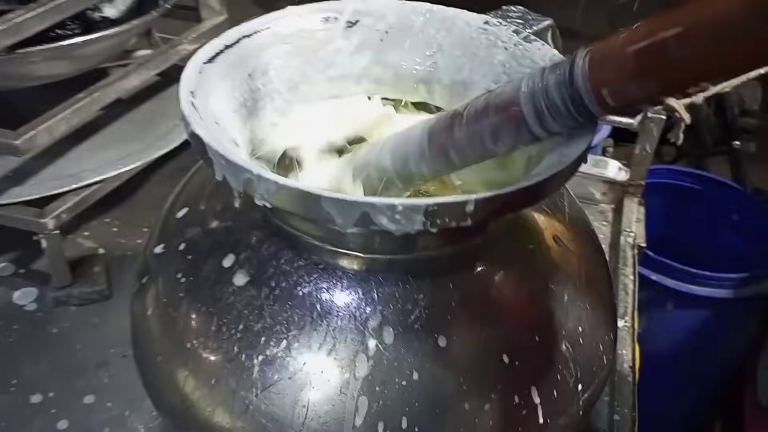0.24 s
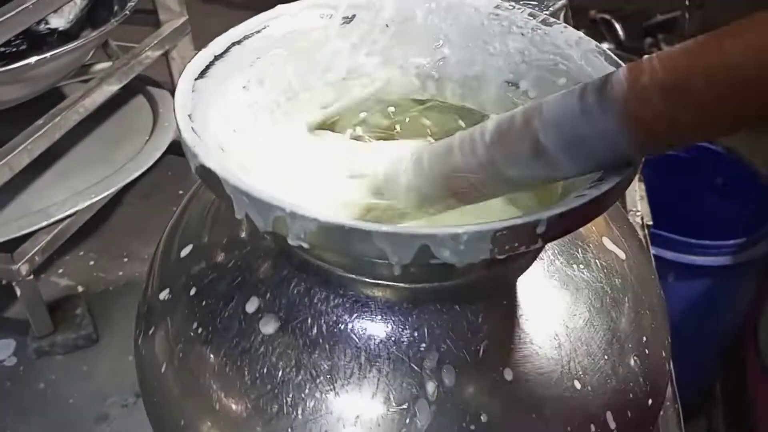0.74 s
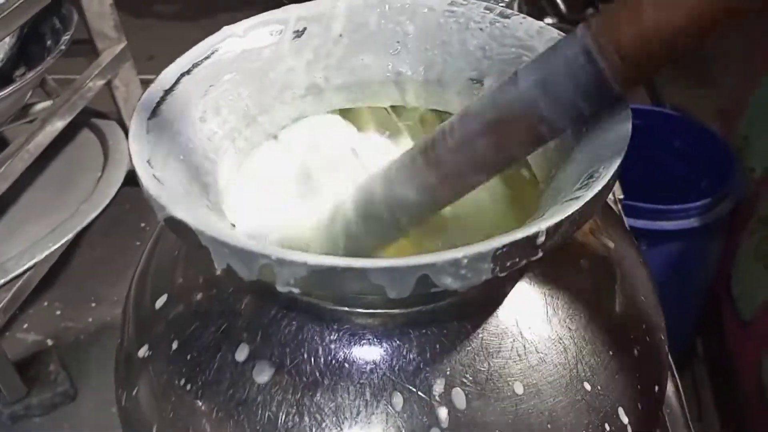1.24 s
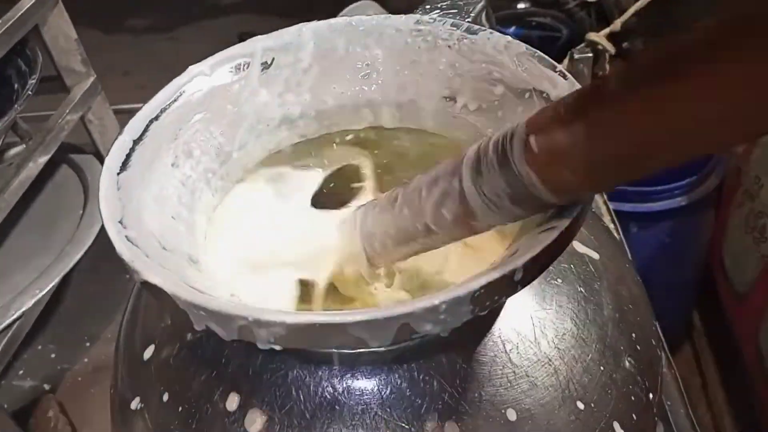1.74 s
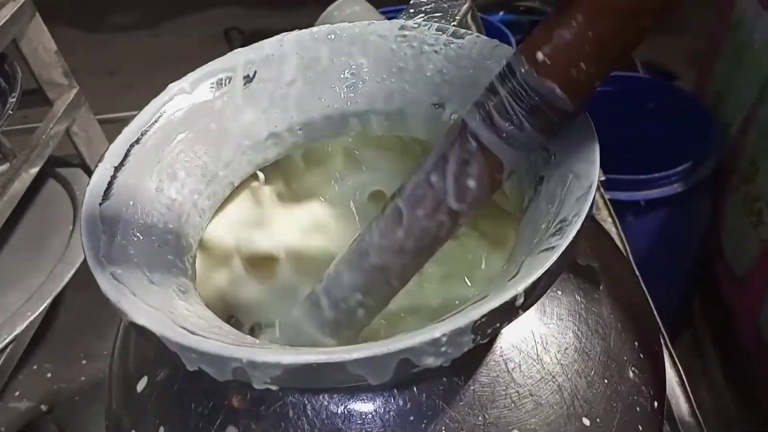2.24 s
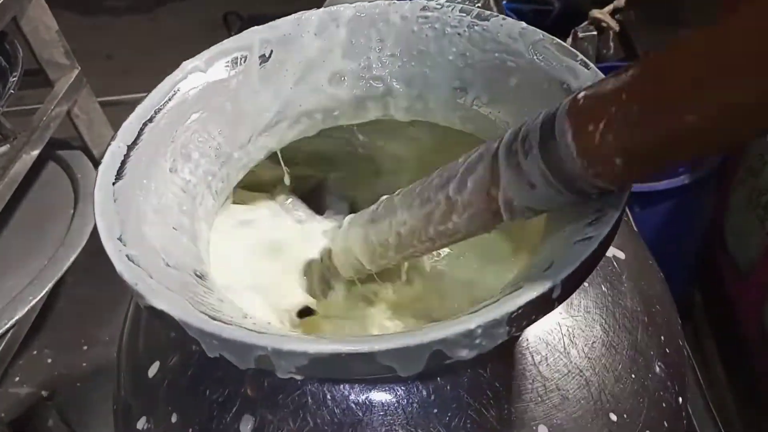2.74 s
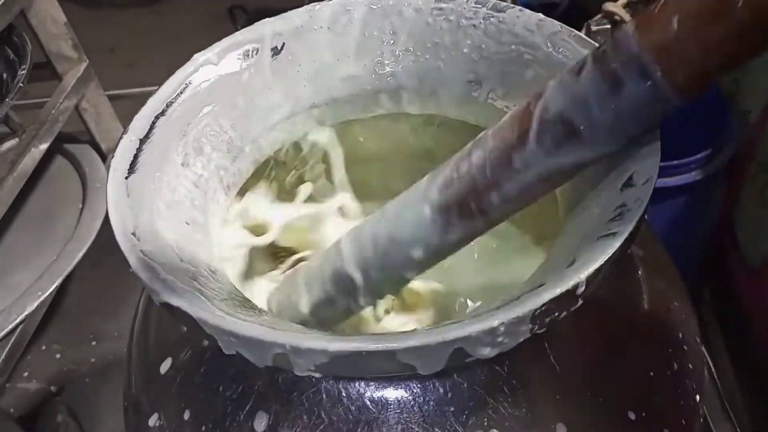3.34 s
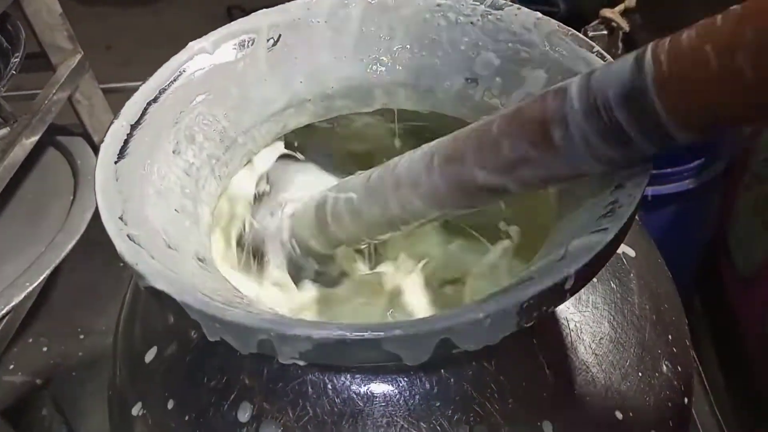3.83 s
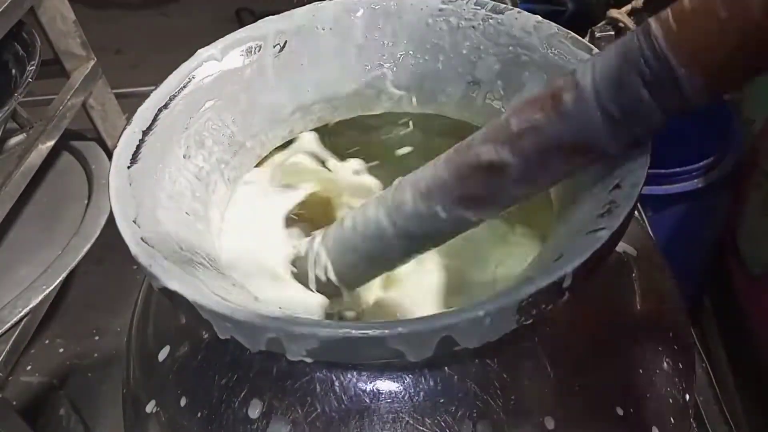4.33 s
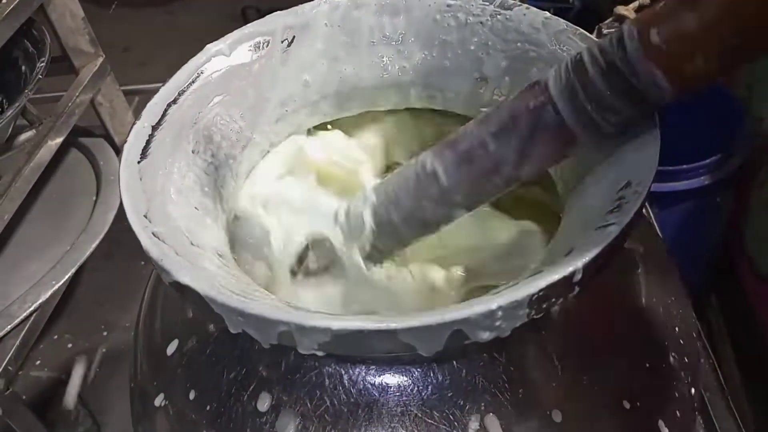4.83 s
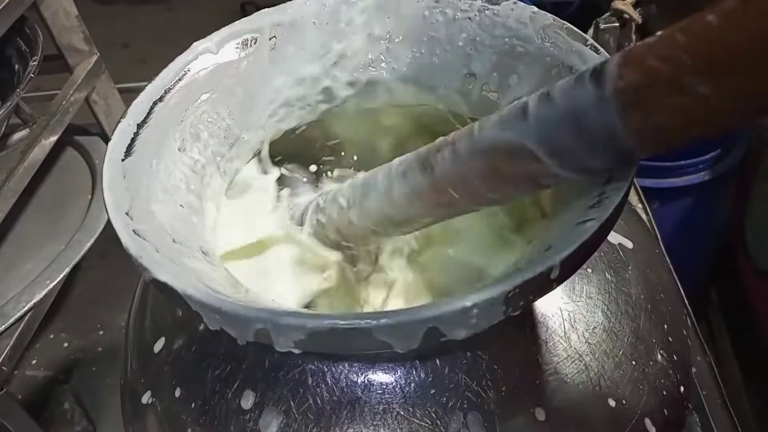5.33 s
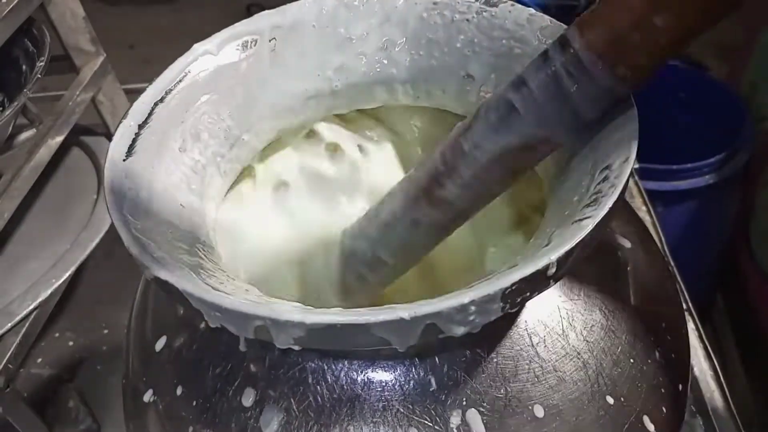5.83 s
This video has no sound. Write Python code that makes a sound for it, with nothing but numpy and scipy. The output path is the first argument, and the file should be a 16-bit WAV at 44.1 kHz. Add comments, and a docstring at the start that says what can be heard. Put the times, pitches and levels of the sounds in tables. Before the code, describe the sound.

Close up, a wooden stick churns watery curd inside a round metal pot. A little over twice a second, clustered air pockets gulp at one low pitch with wet slaps, wrapped in gurgles, splashes and froth fizz. Between strokes come small plops and slurps as the stick draws back. A faint street stall wash and low rumble lie behind.

```python
"""Big air pockets gulp at one low pitch as a wooden stick churns curd in a round metal pot, a little over
two strokes a second. Each gulp is a damped tone with a slap of noise that rings the pot. Bubbles gurgle, curd
splashes and froth fizzes: swarms of short rings, shaped by each stroke. The stick draws back with a plop,
a noise slurp and a low throb. Behind it lie a street stall's filtered noise, low rumble and thin whine."""
import sys
import numpy as np
from scipy import signal
from scipy.fft import rfft, irfft
from scipy.io import wavfile

SR = 44100
rng = np.random.default_rng(int(sys.argv[2]) if len(sys.argv) > 2 else 0)


def to_wav(sig):
    """Store sig (one row per channel, or 1-D mono) as 16-bit WAV at the path in sys.argv[1].

    Samples outside -1..1 are clipped; the rate is SR.
    """
    pcm = np.clip(np.atleast_2d(sig), -1, 1) * 32767
    pcm = np.round(pcm).astype(np.int16)
    wavfile.write(sys.argv[1], SR, pcm.T)  # frames by channels


N = 267907  # length in samples
TIME = np.arange(N) / SR

# Big air pockets: start_s, level_db (peak, before the throb trim), pitch_hz (at the peak), swell_s (time to peak)
AIR_POCKETS = [(0.169, -15, 220, 0.01), (0.21, -14, 235, 0.0097), (0.256, -14.5, 229, 0.018),
               (0.298, -15.5, 230, 0.0076), (0.603, -15.5, 193, 0.018), (0.647, -12.5, 227, 0.013),
               (0.722, -9, 220, 0.011), (1.055, -13, 217, 0.015), (1.076, -17.4, 243, 0.025),
               (1.132, -13.5, 244.0, 0.013), (1.159, -11, 224.5, 0.027), (1.203, -17.5, 231.5, 0.034),
               (1.568, -11.5, 230, 0.0074), (1.589, -11, 222, 0.01), (1.638, -9.5, 224, 0.0115),
               (1.988, -11.5, 218.0, 0.01), (2.036, -8.5, 243, 0.0077), (2.068, -9.5, 219, 0.016),
               (2.105, -13.5, 224, 0.011), (2.125, -25, 238, 0.033), (2.468, -10.5, 219, 0.011),
               (2.489, -13, 233, 0.012), (2.552, -7.5, 225, 0.0088), (2.591, -11.5, 220, 0.013),
               (2.885, -11.5, 212, 0.0095), (2.915, -10, 221, 0.009), (2.961, -16, 233.6, 0.017),
               (2.992, -10, 219.0, 0.01), (3.029, -14.5, 213, 0.017), (3.369, -10, 224, 0.0056),
               (3.39, -7.5, 228.0, 0.0123), (3.435, -15, 224, 0.0091), (3.466, -7.5, 229, 0.0136),
               (3.513, -12, 225, 0.013), (3.818, -8.5, 220, 0.0096), (3.86, -10, 213, 0.012),
               (3.897, -9, 222, 0.014), (3.938, -11, 216, 0.014), (3.977, -15, 202, 0.015),
               (4.274, -17.5, 204, 0.022), (4.297, -10.5, 224.0, 0.017), (4.33, -14.5, 258, 0.019),
               (4.387, -10.5, 220, 0.016), (4.701, -14, 229, 0.0157), (4.736, -9, 221.0, 0.009),
               (4.783, -9, 222, 0.015), (4.818, -9.5, 224, 0.012), (4.855, -10, 218, 0.013),
               (5.205, -10.5, 244, 0.0059), (5.221, -16.5, 201, 0.024), (5.281, -14.4, 247, 0.0056),
               (5.306, -9.5, 227.5, 0.012), (5.368, -17.6, 243, 0.0137), (5.652, -9, 213.0, 0.0092),
               (5.707, -10, 232, 0.0082), (5.737, -8.5, 224, 0.014), (5.768, -17, 233, 0.0153),
               (5.831, -22.0, 216, 0.018)]
# Colour of the slap: pitch_hz, level_db (per Hz, relative)
SLAP_COLOUR = [(60, -25.5), (130, -10.5), (210, 2.5), (380, 10), (560, 5), (850, -9), (1100, -14),
               (1800, -26), (3000, -41.5), (8000, -60)]
# Ringing air in the pot, belly then neck: pitch_hz, decay_s (to -60 dB), level_db (relative)
POT_MODES = [(233, 0.16, 9), (325, 0.1, -7.5), (375.7, 0.51, -7.5), (465, 0.25, -19), (520, 0.14, -23),
             (690, 0.04, -31.5), (752, 0.2, 7.5), (916, 0.27, 2.5)]


def gulps(throb_db=-.5, fall=1.98, sag=0.1, slap_db=4.0, slap_t60=0.072):
    """Each pocket closes with a slap, then throbs for a few cycles as its pitch settles."""
    throbs, slap_power = np.zeros(N), np.zeros(N)
    t = np.arange(SR // 5) / SR
    slap_shape = (1 - np.exp(-t / .002)) * decay(t, slap_t60)
    for s, db, hz, swell in AIR_POCKETS:
        start, _, _, force_db, *_ = min(STROKES, key=lambda stroke: abs(stroke[0] - s))
        # slaps grow as the stick drives deeper, then settle at one level, softer after forceful strokes
        depth_db = np.interp(s - start, [0, 0.097, 0.31], [-43, -15 + force_db, -21])
        add(throbs, s, amp(db + throb_db) * throb(hz, swell, fall, sag))
        add(slap_power, s, (amp(db + depth_db) * slap_shape) ** 2)
    wet_noise = steadied(coloured(rng.standard_normal(N), SLAP_COLOUR), .015)
    slaps = amp(slap_db) * np.sqrt(slap_power) * wet_noise
    return throbs + slaps + pot(slaps, POT_MODES)


def throb(hz, swell, fall, sag):
    """A pocket of air swells and dies within a few cycles while its pitch settles downward."""
    u = np.arange(SR // 5) / SR / swell  # time counted in swells; loudest at 1
    turns = np.cumsum(hz * (1 + sag * (2 ** (1 - u) - 1))) / SR
    envelope = u ** 2 * np.exp(2 * (1 - u ** fall) / fall)
    return envelope * np.sin(2 * np.pi * turns)


# The stick draws back and opens a hollow: start_s, plop_db, throb_db
BACKSTROKES = [(0.553, -32, -49), (1.387, -46, -33), (1.954, -25.5, -47), (2.324, -23.5, -39),
               (3.253, -32.5, -26), (4.172, -27.5, -25), (5.079, -31, -22.5), (5.977, -43, -35.5)]
# Colour of the slurp: pitch_hz, level_db (per Hz, relative)
SLURP_COLOUR = [(250, -23.5), (480, 1), (680, -7.5), (890, 1), (1080, -4), (1300, -18.5), (1800, -19),
                (3000, -43.5)]


def backstrokes(plop_hz=890, soft=8, slurp_db=-9, slurp_t60=.22, throb_hz=228, swell=0.017):
    """The hollow behind the stick opens with a plop, a short slurp and a soft low throb."""
    plop, slurp, low = np.zeros((3, N))
    t = np.arange(SR // 5) / SR
    ring = bubble(plop_hz, t60=.09, rise=.03, soft=soft)
    slurp_shape = (1 - np.exp(-t * plop_hz / soft)) * decay(t, slurp_t60)
    for s, plop_db, throb_db in BACKSTROKES:
        add(plop, s, amp(plop_db) * ring / abs(ring).max())
        add(slurp, s, amp(plop_db + slurp_db) * slurp_shape)
        add(low, s, amp(throb_db) * throb(throb_hz, swell, fall=0.92, sag=0.04))
    slurp_noise = coloured(rng.standard_normal(N), SLURP_COLOUR)
    return walls(plop, t60=0.081, wet=0.35) + slurp * slurp_noise + low


# Colour of the gurgle: pitch_hz, level_db (per Hz, relative)
GURGLE_COLOUR = [(60, -12.5), (110, 2.5), (200, 9), (300, 7), (390, 2), (520, -3), (700, -14.5), (880, -12),
                 (1050, -17.5), (1500, -49.5)]


def gurgle(gurgle_db=6.0, ring_db=12):
    """Large bubbles roll through the curd and ring the belly of the pot."""
    level = motion(size=0, early=-0.38, rise_db_per_s=486, fall_db_per_s=316.5, arch_db=1,
                   grow_db=1.5, lull_db=2.0, rest_db=-57.5, lumps_db=2.5)
    large = swarm(128.0, 1096, per_s=500, cycles=18.0, spread_db=3.5, rise=0.042)
    ringing = large + amp(ring_db) * pot(large, POT_MODES)
    dense = level * steadied(coloured(ringing, GURGLE_COLOUR), 0.16)
    single = droplets(level, GURGLE_COLOUR, 340, 950, t60=.08, spread_db=1.5, glide=.04, count=240)
    return amp(gurgle_db) * (.9 * dense + .35 * walls(single, t60=.1, wet=.7))


# Colour of the splash: pitch_hz, level_db (per Hz, relative)
SPLASH_COLOUR = [(500, -41.5), (800, -6.5), (1100, -5.5), (1450, 0), (1780, 2), (2150, 0.5), (2450, -9.5),
                 (3200, -26.5), (5000, -45.5)]
# Ringing air in the pot's neck: pitch_hz, decay_s (to -60 dB), level_db (relative)
NECK_MODES = [(1136, 0.028, 3), (1335, 0.012, -1), (1702, 0.42, -8.5), (1856, 0.057, 0.5),
              (2020, 0.057, -15.5)]


def splash(dense_db=-3, single_db=-4, ring_db=10):
    """Curd folds back on itself: middling bubbles that ring the neck of the pot."""
    strokes = motion(size=1, early=0.59, rise_db_per_s=130.5, fall_db_per_s=150.5, arch_db=6.5,
                     grow_db=0.5, lull_db=4, rest_db=-50, lumps_db=1.5)
    level = squelches() + strokes
    medium = swarm(649, 3404, per_s=1500, cycles=51, spread_db=4.5, rise=0.036)
    ringing = medium + amp(ring_db) * pot(medium, NECK_MODES)
    dense = level * steadied(coloured(ringing, SPLASH_COLOUR), 0.31)
    single = droplets(level, SPLASH_COLOUR, 850, 2500, t60=.07, spread_db=1.8, glide=.03, count=700)
    return amp(dense_db) * dense + amp(single_db) * walls(single, t60=.09, wet=.6)


# Air squeezed out past the stick: start_s, length_s, level_db (peak, before the splash trims)
SQUELCHES = [(2.899, 0.15, -33.5), (3.762, 0.067, -31.5)]


def squelches():
    """Extra gain of the splash while air is squeezed out past the stick."""
    level = np.zeros(N)
    for s, length, db in SQUELCHES:
        add(level, s, amp(db) * np.hanning(int(length * SR)))
    return level


# Colour of the froth and of the flung gobs: pitch_hz, level_db (per Hz, relative)
FROTH_COLOUR = [(1500, -11), (2600, -11.5), (3300, -8), (4200, -4.5), (5200, 2.5), (6000, -4.5),
                (7000, -17), (8300, -32), (11500, -35), (13800, -38), (15000, -12.5), (16000, -32)]


def froth(dense_db=-5.5, single_db=-4.37, flicker_db=4.0):
    """Foam fizzes, small drops land, and the finest spray ticks above them."""
    level = motion(size=2, early=0.7, rise_db_per_s=268, fall_db_per_s=191, arch_db=6.5,
                   grow_db=1.5, lull_db=7, rest_db=-58.5, lumps_db=2.96)
    fine = swarm(2000, 15640, per_s=6000, cycles=14, spread_db=3, rise=.05)
    flicker = amp(flicker_db * wander(22))
    dense = level * flicker * steadied(coloured(fine, FROTH_COLOUR), 0.25)
    single = droplets(level, FROTH_COLOUR, 2600, 6700, t60=.04, spread_db=3, glide=.02, count=2100)
    return amp(dense_db) * dense + amp(single_db) * walls(single, t60=.06, wet=.55) + spray(level)


# Colour of the soft ticks: pitch_hz, level_db (per Hz, relative)
SPRAY_COLOUR = [(2000, -22.5), (5200, 4), (7000, 6.5), (8500, -13), (12000, -9.5), (13800, -27),
                (15200, -3)]
# Colour of the finest specks: pitch_hz, level_db (per Hz, relative)
SPECK_COLOUR = [(6800, 0.5), (8000, -0.5), (11500, -3.5), (12500, -6.5)]


def spray(level, spray_db=-21, t60=0.039, specks_db=-31):
    """Fine spray lands in soft ticks and tiny pitched specks; the ticks keep landing between strokes."""
    lingering = np.sqrt(level * level.max())
    sizes = amp(3.6 * np.minimum(rng.exponential(1, N), 3))
    landings = (rng.random(N) < 60 / SR) * sizes  # about 60 a second
    bursts = signal.lfilter([1], [1, -decay(1 / SR, t60)], landings)
    ticks = lingering * bursts * coloured(rng.standard_normal(N), SPRAY_COLOUR)
    specks = droplets(level, SPECK_COLOUR, 6800, 12500, t60=.018, spread_db=2.9, glide=.02, count=1300)
    return amp(spray_db) * ticks + amp(specks_db) * walls(specks, t60=.04, wet=.6)


# Strokes of the stick: start_s (air goes under), lead_s (of the spray, scaled for each bubble size), length_s,
# force_db (extra, for the deep slaps), gurgle_db, splash_db, froth_db (base levels, before shaping and trims)
STROKES = [(0.173, 0.066, 0.16, 1, -35, -41.5, -45), (0.606, 0.0078, 0.2, 4, -36.5, -45, -42.5),
           (1.049, 0.041, 0.19, -11, -35.5, -46.5, -45.5), (1.553, 0.005, 0.19, 5.5, -35, -46, -48.5),
           (1.989, 0.088, 0.15, 6, -30, -44.5, -49), (2.435, 0.0037, 0.22, 1, -36, -44.5, -50),
           (2.879, 0.08, 0.21, -1, -30.5, -45, -48), (3.378, 0.011, 0.22, -9, -35, -44.5, -47),
           (3.812, 0.039, 0.23, 8, -32.5, -41.5, -48), (4.279, 0.089, 0.23, -17, -34.5, -45, -46.5),
           (4.708, 0.064, 0.23, 2, -33.5, -44.5, -45), (5.199, 0.029, 0.2, -18, -33.5, -44, -49),
           (5.649, 0.035, 0.16, -11, -30, -43, -45), (6.1, 0.01, 0.2, 0, -48, -57, -40)]


def motion(size, early, rise_db_per_s, fall_db_per_s, arch_db, grow_db, lull_db, rest_db, lumps_db):
    """Gain of one bubble size (0 gurgle, 1 splash, 2 froth): strokes rise, arch, lull and die back."""
    turn, turn_width = .68, .11  # shares of a stroke: where the stick turns round, and the lull's width
    t = np.arange(0, N, 64) / SR
    power = amp(rest_db) ** 2
    for start, lead, length, _, *levels_db in STROKES:
        begin, end = start - early * lead, start + length
        u = np.clip((t - begin) / (end - begin), 0, 1)  # progress through the stroke
        lull = lull_db * np.exp(-((u - turn) / turn_width) ** 2)
        held = arch_db * np.sin(np.pi * u) + grow_db * (u - .5) - lull
        edges = rise_db_per_s * np.maximum(begin - t, 0) + fall_db_per_s * np.maximum(t - end, 0)
        power = power + amp(levels_db[size] + held - edges) ** 2
    return np.interp(TIME, t, np.sqrt(power)) * amp(lumps_db * wander(20))


# Clearest single rings: bubbles, and the pot's air ringing near 380 and 860 Hz:
# start_s, level_db (peak, before the shiver), pitch_hz (at the start), decay_s (to -60 dB)
CLEAR_RINGS = [(0.228, -31, 2270, 0.13), (0.383, -37.5, 2166, 0.15), (0.455, -36.5, 2134, 0.25),
               (0.685, -28.5, 1410, 0.06), (0.654, -23, 610, 0.021), (0.726, -16, 856, 0.019),
               (0.84, -37, 617, 0.1), (1.641, -23.5, 856, 0.043), (1.694, -21, 392, 0.067),
               (2.549, -31.5, 830, 0.14), (2.552, -18, 410, 0.016), (2.594, -23.5, 810, 0.021),
               (2.625, -30, 1814, 0.03), (2.68, -42.5, 2950, 0.22), (2.806, -27.5, 1550, 0.025),
               (2.924, -18.5, 1620, 0.015), (3.066, -32, 1386, 0.19), (3.474, -28, 849, 0.047),
               (3.567, -27.5, 381, 0.21), (3.944, -25.5, 867, 0.06), (3.988, -24, 3200, 0.0043),
               (4.344, -24, 377.7, 0.19), (4.417, -39, 384, 0.18), (4.428, -27.5, 2067, 0.037),
               (4.855, -20.5, 388, 0.21), (4.861, -22, 846, 0.04), (5.239, -23, 378, 0.074),
               (5.307, -25.5, 1680, 0.022), (5.312, -22.5, 827, 0.024), (5.373, -21.5, 379, 0.042),
               (5.527, -31.5, 1880, 0.046), (5.593, -15.5, 1443, 0.019), (5.782, -23, 380, 0.18),
               (5.843, -24, 815, 0.017)]


def clear_rings(rise=0.033, soft=4, shiver_db=2):
    """Single bubbles, and the pot's air near 380 and 860 Hz, ring clearly; the moving curd makes them shiver."""
    out = np.zeros(N)
    for s, db, hz, t60 in CLEAR_RINGS:
        ring = bubble(hz, t60, rise, soft)
        add(out, s, amp(db) * ring / abs(ring).max())
    return out * amp(shiver_db * wander(140))


# Gobs of curd that spatter on the wall: start_s, level_db (before the spat trim), decay_s (to -60 dB)
SPATS = [(0.6523, -31.5, 0.053), (1.049, -28.5, 0.22), (2.8514, -33, 0.11), (2.956, -22, 0.051),
         (3.789, -24.5, 0.11), (3.8514, -24.5, 0.067), (3.987, -25, 0.034), (4.227, -20, 0.025),
         (4.388, -25.5, 0.1), (4.46, -29, 0.16), (4.704, -21, 0.076), (5.183, -16.5, 0.018),
         (5.3616, -25.5, 0.13), (5.5895, -28, 0.14), (5.623, -14, 0.031), (5.9656, -32, 0.024)]


def spats(spat_db=-5, attack_s=0.0024):
    """Flung gobs burst into a brief spray of froth-coloured noise."""
    level, t = np.zeros(N), np.arange(SR // 5) / SR
    for s, db, t60 in SPATS:
        add(level, s, amp(db + spat_db) * (1 - np.exp(-t / attack_s)) * decay(t, t60))
    return level * coloured(rng.standard_normal(N), FROTH_COLOUR)


# Colour of the street wash: pitch_hz, level_db (per Hz, relative)
STALL_COLOUR = [(18, -53.5), (30, -55), (90, -2), (177, -1.5), (237, -4.5), (324, -13), (639, -9),
                (897, -12), (1170, -32), (1820, -14.5), (2990, -20.5), (5450, -35), (8720, -54.5),
                (13300, -71.5), (15500, -28.5)]
# Thin whine from the street, joined by straight lines: time_s, level_db (rms, before its flutter)
WHINE_LEVELS = [(0, -65.5), (2.6, -75), (4.15, -60), (4.5, -69), (4.84, -71), (4.91, -51.5), (5.02, -69),
                (5.18, -46.5), (5.32, -65), (6.07, -87.5)]


def stall(wash_db=-49.5, rumble_db=-59, whine_hz=2574):
    """Gently drifting street wash, an uneven low rumble and a thin wavering whine."""
    wash = amp(wash_db + 1.2 * wander(4)) * coloured(rng.standard_normal(N), STALL_COLOUR)
    rumble_colour = [(30, -26.0), (85, 12.5), (140, -2.0), (240, -10), (400, -31.5), (1500, -45.5)]
    rumble = amp(rumble_db + 2 * wander(6.7)) * coloured(rng.standard_normal(N), rumble_colour)
    phase = 2 * np.pi * np.cumsum(whine_hz + 7 * wander(20)) / SR
    whine_db = np.interp(TIME, *np.transpose(WHINE_LEVELS)) + 4.6 * wander(23)
    whine = amp(whine_db) * np.sqrt(2) * np.sin(phase)
    return wash + rumble + whine


def bubble(hz, t60, rise, soft):
    """A damped sine with a soft start; a positive rise makes its pitch climb as it rings."""
    t = np.arange(int(t60 * SR) + 2) / SR
    tone = np.sin(2 * np.pi * hz * t * (1 + rise * t / t60 / 2))
    return tone * decay(t, t60) * (1 - np.exp(-t * hz / soft))


def swarm(low_hz, high_hz, per_s, cycles, spread_db, rise, count=36):
    """Bubbles of many sizes burst at random, a few much louder than the rest; evenly spread in pitch."""
    out = np.zeros(N)
    for hz in np.linspace(low_hz, high_hz, count):
        sizes = amp(spread_db * np.minimum(rng.exponential(1, N), 4))
        bursts = sizes * (rng.random(N) < per_s / count / SR)
        ring = bubble(hz, cycles / hz, rise, 0.35)
        out += signal.oaconvolve(bursts, ring / np.linalg.norm(ring))[:N]
    return out


def droplets(level, colour, low_hz, high_hz, t60, spread_db, glide, count):
    """Separate bubbles, each sized by the curd's motion at its birth, ring on at their own gliding pitch."""
    place, pitch, size, length, bend = rng.random((count, 5)).T
    births = (np.arange(count) + place) * (N - 1) / count
    grid = np.linspace(low_hz, high_hz, 200)
    points_hz, points_db = np.transpose(colour)
    # most bubbles fall where the colour peaks
    likely = np.cumsum(amp(np.interp(grid, points_hz, points_db)) ** 2)
    pitches = np.interp(pitch, likely / likely[-1], grid)
    spread = unit(amp(spread_db * np.minimum(-np.log(1 - size), 3)))
    sizes = spread * level[births.astype(int)]
    out = np.zeros(N)
    for k in range(count):
        ring_t60 = t60 * 2 ** (2 * length[k] - 1)  # half to double
        ring = bubble(pitches[k], ring_t60, glide * (2 * bend[k] - 1), soft=5.2)
        add(out, births[k] / SR, sizes[k] * ring / np.linalg.norm(ring))
    return out * np.sqrt(N / count)


def pot(x, modes):
    """The air in the pot rings at its modes; the strongest pitch passes at gain 1."""
    t = np.arange(SR // 2) / SR
    ring = sum(amp(db) * np.cos(2 * np.pi * hz * t) * decay(t, t60) for hz, t60, db in modes)
    return signal.oaconvolve(x, ring / abs(rfft(ring)).max())[:N]


def walls(x, t60, wet):
    """Reflections from the round metal wall fuse separate drops; wet is their share of the power."""
    return np.sqrt(1 - wet) * x + np.sqrt(wet) * echoes(x, t60, delay=.001)


def echoes(x, t60, delay):
    """Dense reflections of random sign that die away; energy 1."""
    t = np.arange(SR // 2) / SR
    hits = rng.choice([-1, 1], len(t)) * (rng.random(len(t)) < 1 / 10)
    taps = hits * (t > delay) * decay(t, t60)
    return signal.oaconvolve(x, taps / np.linalg.norm(taps))[:N]


def coloured(x, points):
    """Filters by a spectrum drawn on a log-frequency axis; rms 1."""
    hz, db = np.transpose(points)
    gain = amp(np.interp(np.log(np.fft.rfftfreq(N, 1 / SR) + 1), np.log(hz), db))
    return unit(irfft(rfft(x) * gain, N))


def steadied(x, seconds):
    """Holds a sound's mean power even over a span, keeping its faster grain; rms 1."""
    power = signal.oaconvolve(x ** 2, np.hanning(int(seconds * SR)), "same")
    return unit(x / np.sqrt(abs(power) + 1e-9))


def wander(hz):
    """Slow random movement up to about a given rate; rms 1."""
    f = np.fft.rfftfreq(N, 1 / SR)
    return unit(irfft(rfft(rng.standard_normal(N)) / (1 + (f / hz) ** 4), N))


def decay(t, t60):
    """Dying away by 60 dB in t60 seconds."""
    return np.exp(-np.log(1000) * t / t60)


def amp(db):
    """Decibels to gain."""
    return 10 ** (np.asarray(db) / 20)


def unit(x):
    """Scales to rms 1."""
    return x / np.sqrt(np.mean(x ** 2) + 1e-20)


def add(mix, s, sound):
    """Mixes a sound in at a time in seconds."""
    part = mix[max(round(s * SR), 0):][:len(sound)]
    part += sound[:len(part)]


def scene(room_db=-17):
    """All the sounds of the curd, with a faint tail from the stall around it, over the background."""
    details = walls(clear_rings() + spats(), t60=0.12, wet=0.6)
    curd = gulps() + backstrokes() + gurgle() + splash() + froth() + details
    tail = amp(room_db) * echoes(curd, t60=.19, delay=0.0061)
    return (curd + tail + stall())[None]


def record(dry, limit_db=-12, edge_hz=15850):
    """A limiter evens out the loudest moments; then a low-pass filter cuts the highest treble."""
    power = signal.oaconvolve(dry ** 2, np.hanning(441)[None] / 220, "same")  # mean over a 10 ms window
    held = dry / (1 + (power / amp(limit_db) ** 2) ** 4) ** (1 / 8)
    low_pass = signal.firwin(511, edge_hz, window=("kaiser", 9), fs=SR)
    return signal.oaconvolve(held, low_pass[None], "same")


dry = scene()
out = record(dry)
to_wav(out)
```